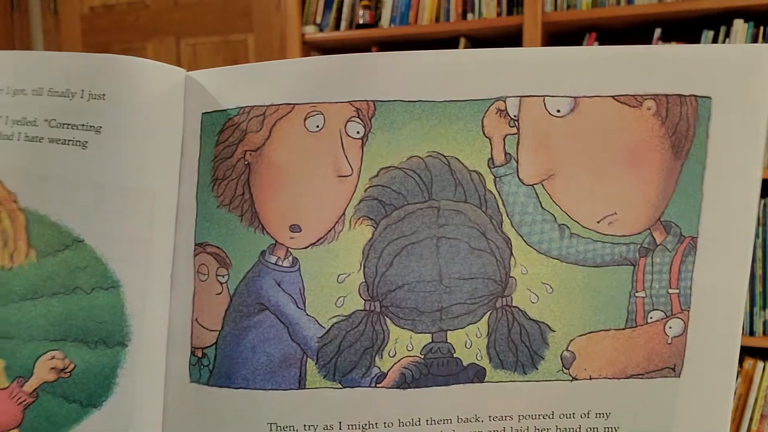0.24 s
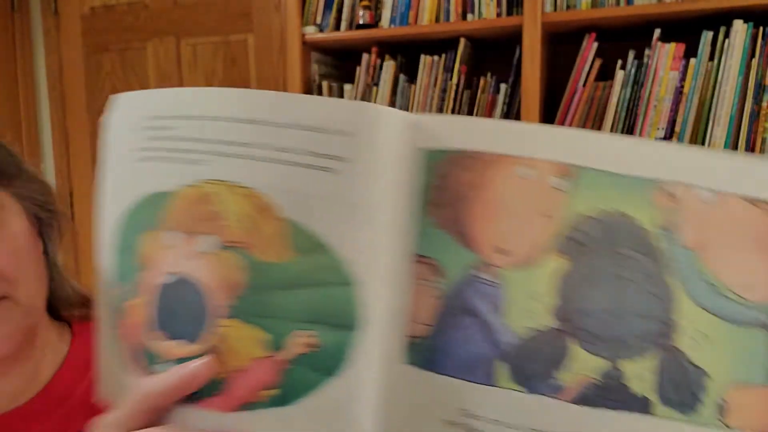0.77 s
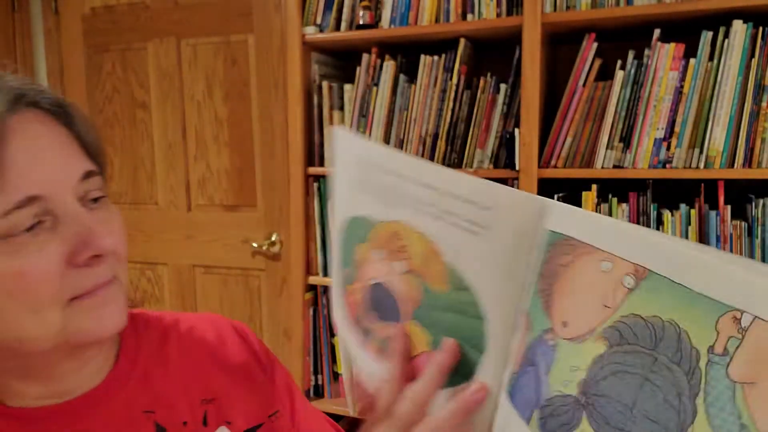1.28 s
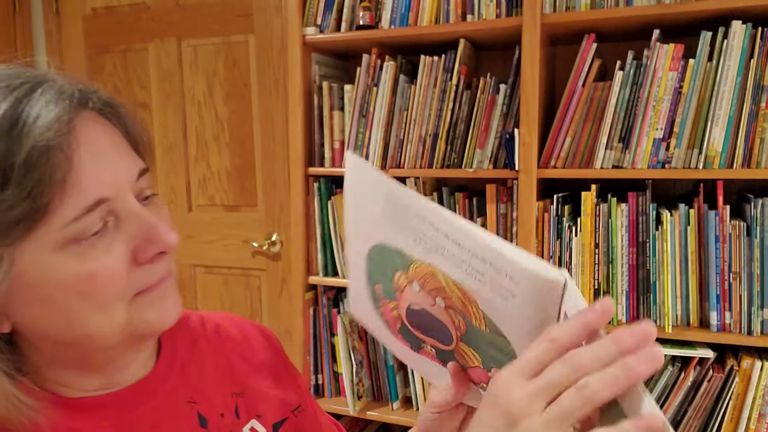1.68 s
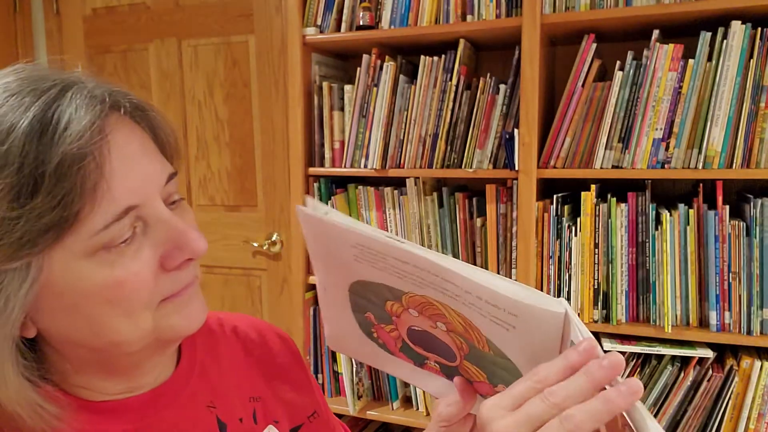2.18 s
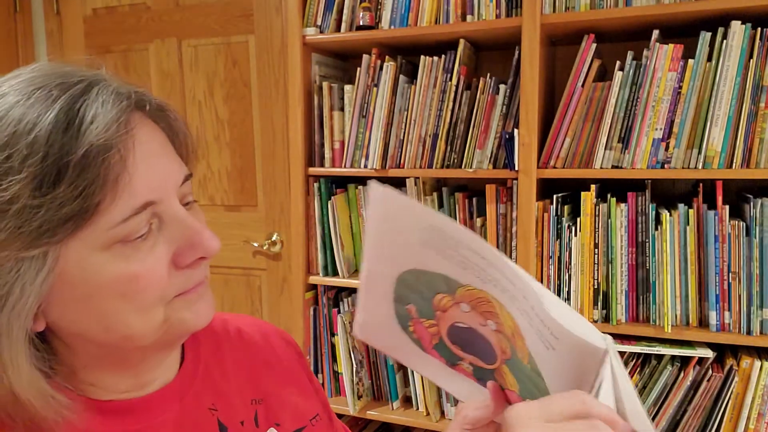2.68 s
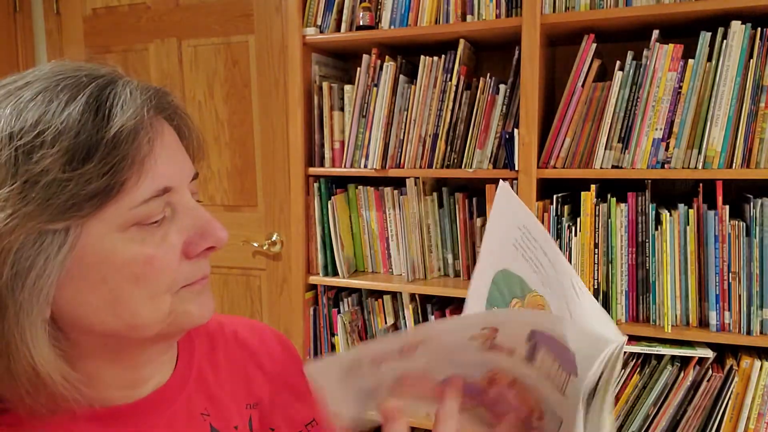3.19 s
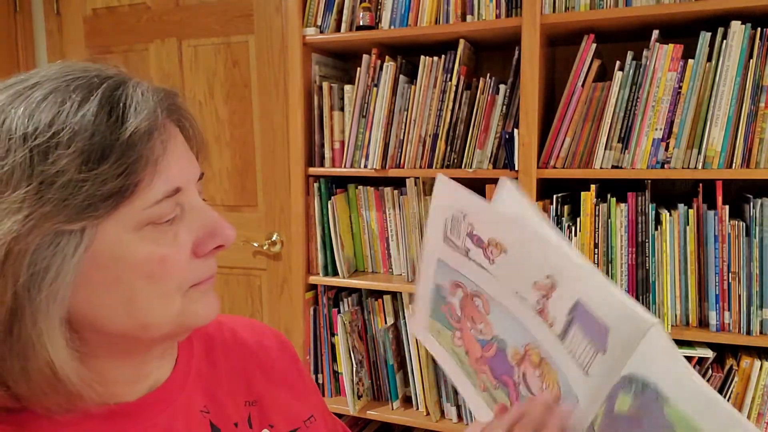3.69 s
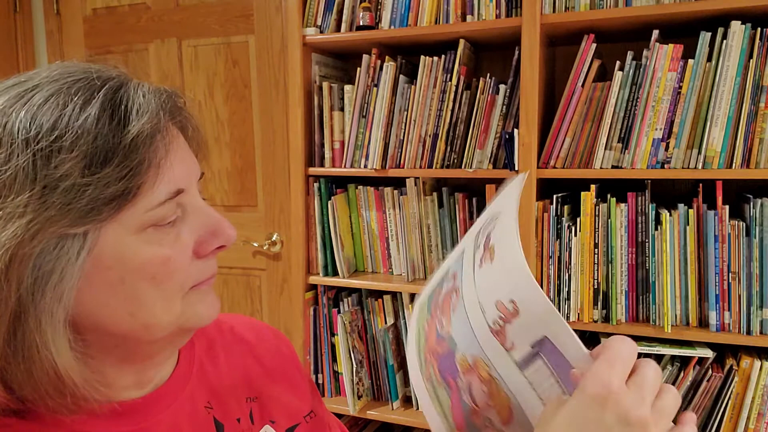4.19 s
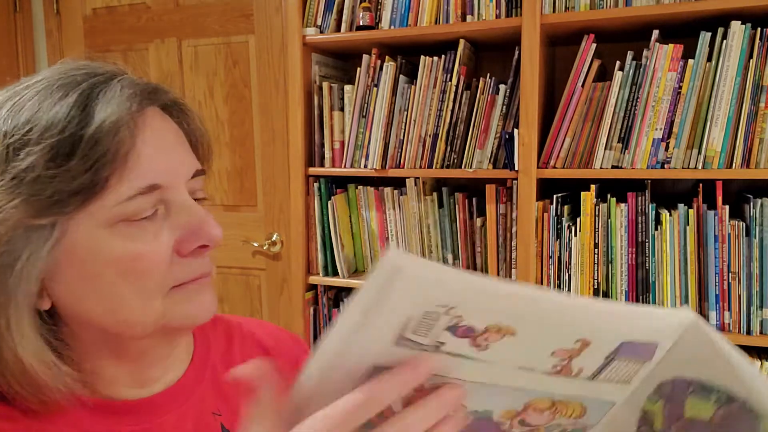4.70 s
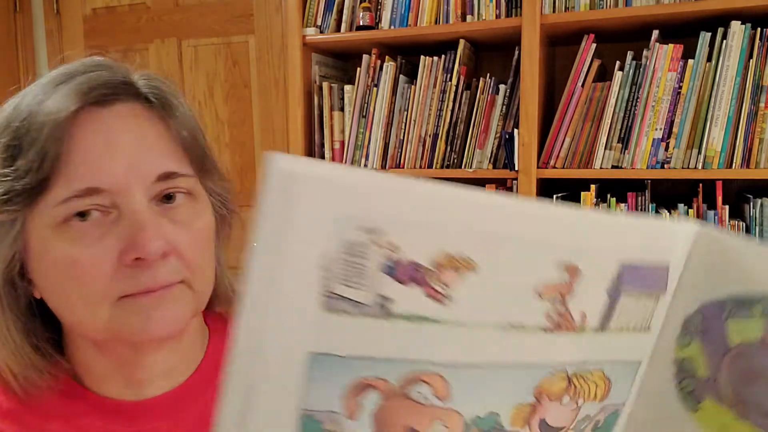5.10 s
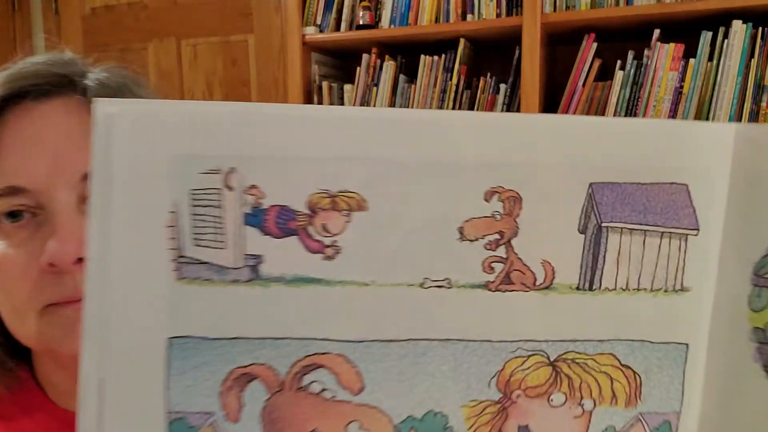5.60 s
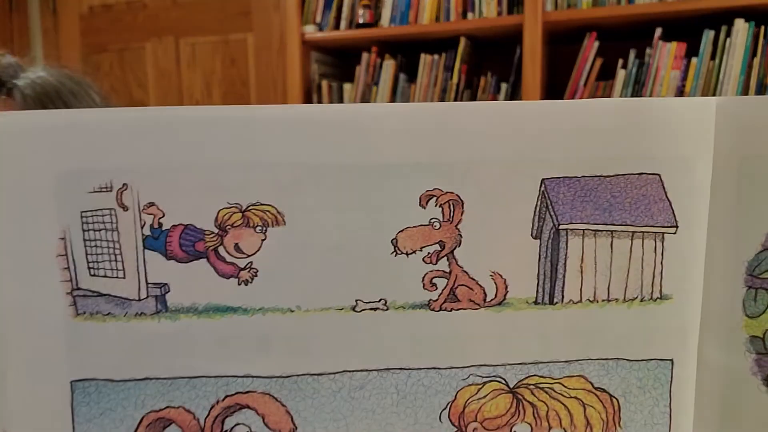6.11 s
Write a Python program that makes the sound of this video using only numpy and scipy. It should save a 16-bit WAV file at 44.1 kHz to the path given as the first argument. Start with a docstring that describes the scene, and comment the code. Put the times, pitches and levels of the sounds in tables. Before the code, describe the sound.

Close to a stereo microphone in a small, quiet room, a thin picture book is lowered with faint slides and soft flaps. Fingers knock quickly on the cover, then a page is turned with a loud, crisp snap and swish. Smaller rustles and smoothing scuffs follow as the book is raised again, fading into low room rumble and faint hiss.

```python
"""Turning a page of a picture book

A book is lowered, a page is turned and the book is raised, close to the microphone in a small, quiet room.
Sliding fingers and paper are stick-slip noise; snaps and flaps of the sheet, low finger touches and palm
scuffs are short avalanches of clicks, coloured by resonances of the sheet; taps on the cover are decaying
modes with a dry tick. Moved air is a low waft.
A diffuse tail of band noise follows the book, over a low rumble and a faint hiss."""
import sys
import numpy as np
from scipy import signal
from scipy.fft import rfft, irfft, next_fast_len
from scipy.io import wavfile
from scipy.ndimage import uniform_filter1d, map_coordinates

SR = 44100
rng = np.random.default_rng(int(sys.argv[2]) if len(sys.argv) > 2 else 0)


def file_out(sig):
    """Save sig as 16-bit WAV at sys.argv[1]."""
    # one column per channel
    cols = np.atleast_2d(sig).T
    # limit, then scale
    lim = np.clip(cols, -1, 1)
    pcm = np.round(lim * 32767).astype(np.int16)
    wavfile.write(sys.argv[1], SR, pcm)


N = 280005
TIME = np.arange(N) / SR   # seconds
PORT_LAG_S = .00021        # delay from the left to the right microphone port

# Fingers tap the cover. Each row: start in seconds, peak of the knock in dB, relative level of the nail in dB.
TAPS = [(1.744, -52, -85), (2.592, -41, -54.5), (2.6323, -33, -51), (2.685, -25.5, -50),
        (2.7249, -35, -52.5), (5.078, -50.5, -82.5), (5.888, -58.5, -98)]


def from_db(db):
    """Decibels to gain."""
    return 10 ** (np.asarray(db) / 20)


def rms_one(x):
    """Scale to unit power."""
    return x / np.sqrt(np.mean(x ** 2) + 1e-20)


def at_hz(points, hz):
    """Read the second column of a table on a log-frequency axis."""
    points = np.array(points)
    return np.interp(np.log(np.maximum(hz, 1)), np.log(points[:, 0]), points[:, 1])


def coloured(x, spectrum):
    """Give a steady excitation a spectrum that falls away beyond both ends; rms 1."""
    size = next_fast_len(N)
    hz = np.arange(size // 2 + 1) * SR / size
    low_skirt = np.minimum(hz / spectrum[0][0], 1)
    high_skirt = np.maximum(hz / spectrum[-1][0], 1)
    gain = from_db(at_hz(spectrum, hz)) * (low_skirt / high_skirt) ** 2
    return rms_one(irfft(rfft(x, size) * gain, size)[..., :N])


def drift(rate):
    """Smooth curve through `rate` random values a second; rms 1."""
    knots = rng.standard_normal(4096)
    return rms_one(map_coordinates(knots, [TIME * rate], order=2, mode="wrap"))


def band(x, low_hz, high_hz, order=2):
    """Causal band-pass."""
    sos = signal.butter(order, [low_hz, min(high_hz, .45 * SR)], "band", fs=SR, output="sos")
    return signal.sosfilt(sos, x + 1e-18)


def add(track, s, sound):
    """Mix a sound in at time s."""
    start = max(int(s * SR), 0)
    track[start:start + len(sound)] += sound[:N - start]


def swell(peak_s, half_s):
    """Speed of a movement that gathers and fades evenly."""
    return np.exp(-np.minimum(((TIME - peak_s) / half_s) ** 2, 50))


def tug(s, length_s, rise_s):
    """Speed of a movement that starts abruptly and slows."""
    return np.clip((TIME - s) / rise_s, 0, 1) * swell(s + rise_s, length_s)


def background(side_db):
    """Low room rumble, nearly alike on both sides, under a faint hiss that differs between them."""
    # Each row: frequency in Hz, relative spectral density in dB.
    rumble_spectrum = [(20, -46), (30, -26), (44, -17.5), (58, 0), (72, -5.5), (87, 2), (110, -12.5),
                       (160, -12), (260, -18), (370, -28.5), (600, -43.5), (1100, -64), (2500, -60)]
    air_spectrum = [(300, 1.5), (1000, 0.5), (2000, -2), (3800, -4), (6000, -8), (8500, -11), (11000, -8.5),
                    (13500, -5.5), (16000, -5.5)]
    shared = rng.standard_normal(N)
    own = rng.standard_normal((2, N))
    rumble = coloured(shared + from_db(side_db) * own, rumble_spectrum)
    air = coloured(rng.standard_normal((2, N)), air_spectrum)
    return from_db(-55) * rumble + from_db(-82.5) * air


def waft():
    """The book is lowered, the page swings over, the book is raised; each pushes air, a low noise."""
    # Each row: peak in seconds, half length in seconds, level in dB.
    swings = [(1.246, 0.33, -57), (3.14, 0.092, -48.5), (4.422, 0.33, -54.5)]
    push = sum(from_db(level_db) * swell(s, half_s) for s, half_s, level_db in swings)
    return push * rms_one(band(rng.standard_normal(N), 42, 150, order=3))


def near_paths(x):
    """Direct sound reaches the left port first; echoes of near surfaces wander in distance and direction."""
    # Nearby surfaces. Each row: mean delay in seconds, level in dB.
    echoes = [(.0026, -9.5), (.0068, -9), (.01, -14.5)]
    out = np.array([x, np.roll(x, int(PORT_LAG_S * SR))])
    for delay_s, level_db in echoes:
        delay = delay_s * (1 + .08 * drift(2))
        lag = PORT_LAG_S * np.tanh(drift(1.6))
        echo = [np.interp(TIME - delay + side * lag / 2, TIME, x) for side in (1, -1)]
        out += from_db(level_db) * np.array(echo)
    return out


def room(x, wet_db, build_s, count=13):
    """Each band's energy feeds a diffuse tail that builds up and dies; long waves reach both ports alike."""
    # The room's decay. Each row: frequency in Hz, time to fall by 60 dB in seconds.
    room_t60 = [(200, 0.17), (1500, 0.26), (6000, 0.26), (15000, 0.25)]
    out = near_paths(x)
    white = rng.standard_normal((2, 2, N))
    edges = np.geomspace(170, 17000, count)
    build = np.exp(-1 / (build_s * SR))
    for k, (low, high) in enumerate(zip(edges, edges[1:])):
        hz = np.sqrt(low * high)
        keep = from_db(-60 / (at_hz(room_t60, hz) * SR)) ** 2   # energy left after one sample
        fed = band(x, low, high, order=3) ** 2
        energy = signal.lfilter([(1 - keep) * (1 - build)], np.poly([keep, build]), fed)
        alike = np.sinc(2 * hz * PORT_LAG_S)   # correlation between the ports
        mid, side = rms_one(band(white[k % 2], low, high, order=3))
        tail = np.sqrt((1 + alike) / 2) * mid + np.sqrt((1 - alike) / 2) * side * [[1], [-1]]
        out += from_db(wet_db) * np.sqrt(np.abs(energy)) * tail
    return out


def placement():
    """The book's place before the microphone, as a gain for each side."""
    # Each row: time in seconds, left minus right in dB.
    position = [(0.3, 2), (0.47, 3), (1.63, -0.5), (2.17, 3.5), (3.17, -0.5), (4.7, 0.5), (5.47, 6),
                (5.5, 3)]
    pan_db = np.interp(TIME, *np.transpose(position))
    return from_db(np.array([pan_db, -pan_db]) / 2)


def taps(knock_db, tick_db, tick_s):
    """Each tap rings the cover's modes, with a dry tick on top."""
    # Modes of the cover board. Each row: frequency in Hz, relative level in dB, 60 dB decay in seconds.
    cover = [(336, -19, 0.03), (532, -2, 0.027), (594, 3, 0.019), (820, -5, 0.0094), (1195, -27, .025),
             (1287, -14, 0.011)]
    out, t = np.zeros(N), TIME[:SR // 8]
    for s, peak_db, nail_db in TAPS:
        knock = np.zeros(len(t))
        for hz, mode_db, t60 in cover:
            decay = np.exp(-np.log(1000) * t / t60)
            # every tap excites the modes a little differently
            knock += from_db(mode_db + rng.normal(0, 1.2)) * np.sin(2 * np.pi * hz * t) * decay
        knock = band(knock, 400, 5000)   # the knock keeps little energy below 400 Hz
        tick = band(rng.standard_normal(len(t)) * np.exp(-t / tick_s), 2200, 6000, order=1)
        add(out, s, from_db(peak_db + knock_db) * knock / np.abs(knock).max())
        add(out, s, from_db(nail_db + tick_db) * rms_one(tick))
    return out


def slips(per_s, spread_db, smooth):
    """Stick-slip clicks of uneven size over a bed of finer friction."""
    sizes = from_db(spread_db * np.minimum(rng.exponential(1, N), 4)) * rng.choice([-1, 1], N)
    born = rng.random(N) < per_s / SR
    return rms_one(sizes * born) + smooth * rng.standard_normal(N)


def strokes():
    """Every sliding movement as (speed, relative level dB, bend dB)."""
    # The paper breaks loose abruptly, then slows.
    # Each row: start in seconds, length in seconds, relative level in dB, bend of the sheet in dB.
    tugs = [(.325, .12, -75.5, 0), (0.569, 0.03, -67, -5), (.75, .18, -71.5, -4.5), (0.98, .13, -56, 1.5),
            (1.24, .1, -57, -3.5), (1.478, 0.085, -57, -3.5), (2.022, .036, -70, -6.5),
            (2.251, .027, -56, 7.5), (2.413, .19, -56.5, 2), (2.73, .052, -50, -1.5),
            (2.888, .2, -55.5, 13.5), (2.972, .14, -42, 3.5), (3.096, .075, -44, 2),
            (3.907, .032, -45.5, 2), (4.629, .047, -53, -1.5), (4.694, .16, -71, -11)]
    # The paper glides, swelling and fading evenly.
    # Each row: peak in seconds, half length in seconds, relative level in dB, bend of the sheet in dB.
    slides = [(0.702, 0.066, -77, -6), (0.901, 0.025, -72.5, -8), (1.15, .12, -55, -1.5),
              (1.64, .11, -67.5, 1), (1.848, .03, -73, -1), (2.18, 0.071, -73.5, -1.5),
              (2.85, .05, -54, -1), (3.367, .055, -54, 3.5), (3.483, 0.074, -63.5, -2),
              (3.776, 0.093, -48, -2), (4.016, 0.056, -54, 5), (4.175, 0.045, -53.5, 2),
              (4.326, 0.04, -49, 3.5), (4.445, 0.072, -55.5, -0.5), (4.874, 0.067, -62.5, -4.5),
              (5.103, 0.11, -67, 6), (5.408, 0.16, -75, 9)]
    for s, length_s, level_db, bend_db in tugs:
        yield tug(s, length_s, rise_s=0.0089), level_db, bend_db
    for s, half_s, level_db, bend_db in slides:
        yield swell(s, half_s), level_db, bend_db
    # with each tap the finger skids briefly, the louder the stronger its nail
    for s, _, nail_db in TAPS:
        yield tug(s, length_s=0.0083, rise_s=0.0022), nail_db + 6, 0.5


def friction():
    """Skin and paper slide on paper: fine slips hiss, coarser ones rasp, creases crinkle; hands rub the cover."""
    # Each row: frequency in Hz, relative spectral density in dB.
    hiss_spectrum = [(2500, -23), (5000, -15.5), (7000, 10), (9800, 0.5), (11000, 1), (13000, 8.5),
                     (16000, -7)]
    rasp_spectrum = [(1500, -22), (2500, -4.5), (3400, 3.5), (5000, -1), (6500, 0), (8500, -9.5),
                     (14000, -34.5)]
    crinkle_spectrum = [(350, -2), (800, -3.5), (1400, -2), (2100, 0), (3000, -4), (5000, -26)]
    rub_spectrum = [(70, -2), (150, 2.5), (240, 3.5), (340, -8), (500, 1.5), (750, -11.5), (1200, -21),
                    (2500, -23)]
    # How hard the hands work on the cover. Each row: time in seconds, effort in dB.
    handling = [(0.0, -80.5), (1.06, -73.5), (1.15, -73.5), (1.59, -61), (2.01, -79), (2.33, -72),
                (2.6, -64.5), (3.15, -59), (3.46, -66), (4.01, -60.5), (4.15, -67.5), (4.54, -59.5),
                (4.7, -73.5), (6.35, -82)]
    usual_stroke_db, creasing = -54, .55   # a stroke above the usual creases more, in dB per dB
    usual_effort_db, grip_db, grip_growth = -70.5, -68, 1.34   # rubbing at usual effort; growth in dB per dB

    power = np.zeros((3, N))
    for speed, level_db, bend_db in strokes():
        # bending trades hiss for crinkle
        crease_db = bend_db + creasing * (level_db - usual_stroke_db)
        layers_db = [level_db - bend_db, level_db, level_db + crease_db]
        power += np.outer(from_db(layers_db) ** 2, speed ** 2)
    hiss, rasp, crinkle = np.sqrt(power)
    effort_db = np.interp(TIME, *np.transpose(handling))
    grip = from_db(grip_db + grip_growth * (effort_db - usual_effort_db))

    pressure = drift(60)   # the fingers judder as they slide
    out = hiss * from_db(-2.0 + 1.0 * pressure) * coloured(slips(7100, 3.7, 0.48), hiss_spectrum)
    out += rasp * from_db(-1.0 + 0.88 * pressure) * coloured(slips(1500, 3.2, 0.42), rasp_spectrum)
    out += crinkle * from_db(-3.5 + 1.5 * drift(80)) * coloured(slips(390, 2.8, 0.39), crinkle_spectrum)
    out += grip * from_db(2.0 * drift(46)) * coloured(slips(200, 4.6, 0.21), rub_spectrum)
    return out


def bursts(table, rise_s, fall_s, grain_db, gain_db, air_db):
    """A fold, touch or scuff is a short avalanche of clicks; a tighter fold reaches higher."""
    out, t = np.zeros(N), TIME[:SR // 10]
    for s, level_db, top_hz in table:
        # single slips last about a millisecond and sound in all bands at once
        grain = rms_one(uniform_filter1d(rng.standard_normal(len(t)), size=40))
        avalanche = from_db(grain_db * grain) * (1 - np.exp(-t / rise_s)) * np.exp(-t / fall_s)
        # most folds sound mainly in this band; the low scuffs stay under it
        clicks = band(avalanche * rng.standard_normal(len(t)), 880, 3900, order=1)
        burst = rms_one(band(clicks, 200, top_hz, order=4)) + from_db(air_db) * rms_one(clicks)
        add(out, s, from_db(level_db + gain_db) * burst)
    return out


def sheet(x):
    """The bowed page rings briefly at its own resonances."""
    # Each row: frequency in Hz, width in Hz, level in dB.
    resonances = [(1350, 53, -19), (1850, 110, -9.5), (2870, 390, -10), (3080, 110, -11), (4110, 38, 1)]
    out = x.copy()
    for hz, width_hz, level_db in resonances:
        r = np.exp(-np.pi * width_hz / SR)
        zeros = np.array([1, 0, -1]) * (1 - r * r) / 2
        poles = [1, -2 * r * np.cos(2 * np.pi * hz / SR), r * r]
        out += from_db(level_db) * signal.lfilter(zeros, poles, x + 1e-18)
    return out


def page():
    """Bursts of the turning sheet and of the hand on the book, all coloured by the sheet's resonances."""
    # Each row: start in seconds, relative level in dB, top frequency in Hz.
    # Sharp snaps, with a few soft, low finger touches on the cover among them.
    snap_and_touch_rows = [(.332, -73, 1290), (.378, -63.5, 3460), (.452, -68.5, 1420), (.481, -69.5, 1490),
                           (1.05, -59, 6000), (1.191, -67, 1990), (1.269, -60.5, 2500), (1.436, -57, 2600),
                           (2.2625, -58.5, 8050), (2.393, -57.5, 4530), (2.416, -52, 5870),
                           (2.986, -31, 6740), (3.051, -38.5, 4500), (3.124, -39.5, 3500),
                           (3.418, -53.5, 2780), (3.788, -44, 4970), (3.917, -52.5, 3450),
                           (3.932, -51, 6000), (4.03, -57.5, 1800), (4.1, -56.5, 4430),
                           (4.123, -52.5, 3030), (4.312, -57, 8500), (5.27, -73.5, 4130),
                           (5.321, -69, 4320), (5.447, -65.5, 2370), (5.467, -79, 6000),
                           (5.515, -81.5, 5500)]
    # Soft flaps of the sheet and low scuffs of the palm.
    flap_and_scuff_rows = [(.757, -73, 1190), (1.376, -60.5, 4970), (1.514, -53.5, 2730), (1.58, -65, 900),
                           (1.607, -63, 800), (1.862, -72.5, 674), (2.481, -52.5, 2800), (2.663, -63, 810),
                           (3.126, -34, 4400), (3.164, -50, 3500), (3.202, -46, 2960), (3.482, -51.5, 2360),
                           (3.55, -57, 1900), (4.377, -49, 4500), (4.413, -49.5, 4400), (4.535, -58, 3470),
                           (4.553, -57.5, 860)]
    quick = bursts(snap_and_touch_rows, rise_s=0.0029, fall_s=0.0019, grain_db=1.5, gain_db=-1.0, air_db=-17)
    slow = bursts(flap_and_scuff_rows, rise_s=0.004, fall_s=0.0037, grain_db=6.5, gain_db=-1.5, air_db=-20)
    return sheet(quick + slow)


def scene():
    """All the sounds of the book in the room, with the moved air and the background."""
    blows = page() + taps(knock_db=0, tick_db=-8.5, tick_s=0.00073)
    book = room(blows + from_db(-2.5) * friction(), wet_db=-2.5, build_s=0.00047)
    return book * placement() + waft() + background(side_db=-14)


def record(dry):
    """The top is cut steeply above 16 kHz."""
    return signal.sosfilt(signal.ellip(12, .1, 80, 16000, fs=SR, output="sos"), dry)


dry = scene()
out = record(dry)
file_out(out)
```